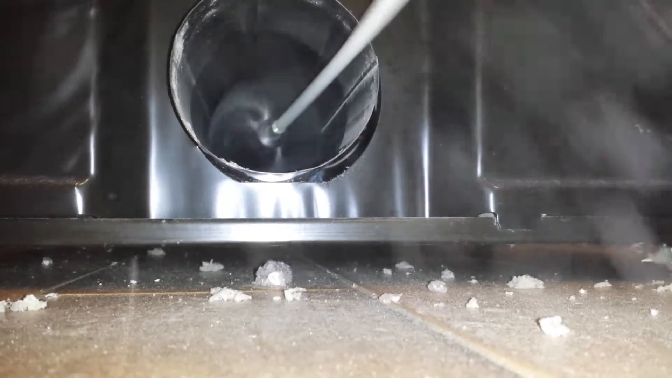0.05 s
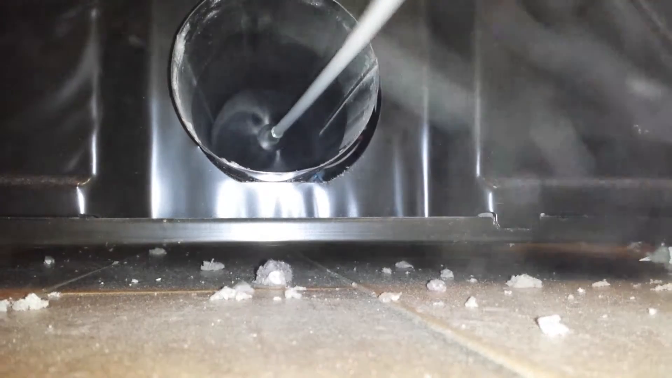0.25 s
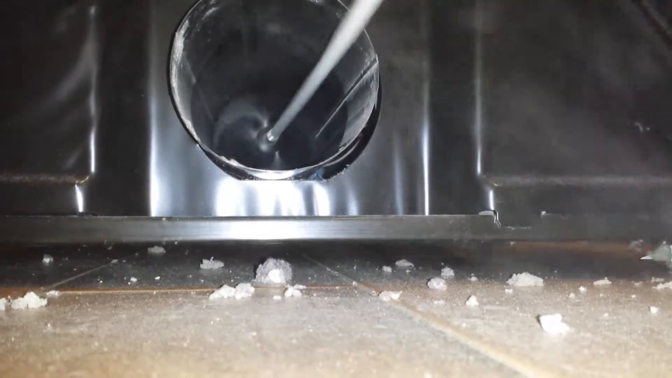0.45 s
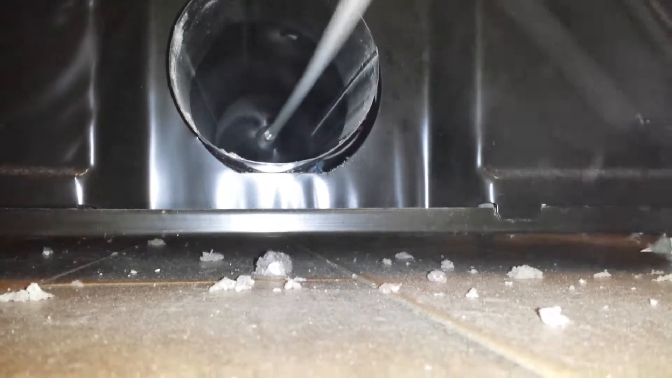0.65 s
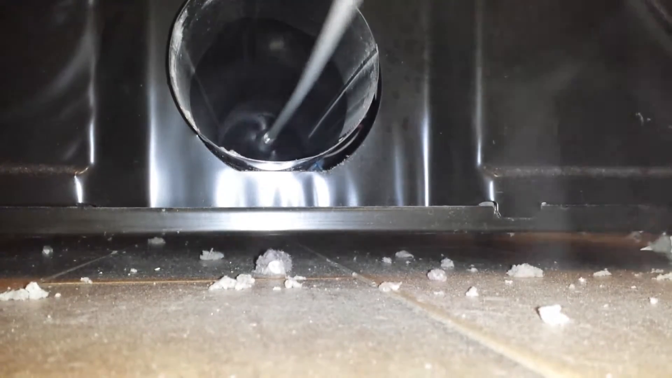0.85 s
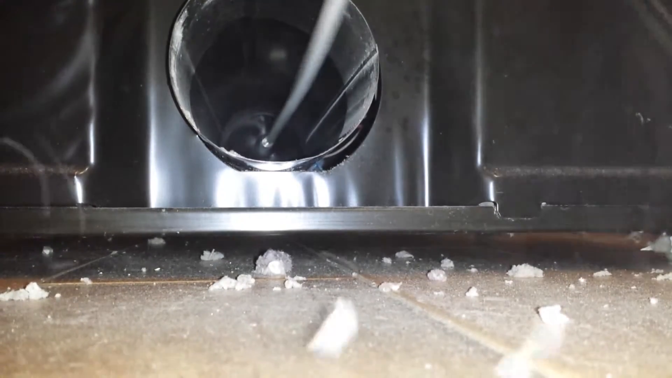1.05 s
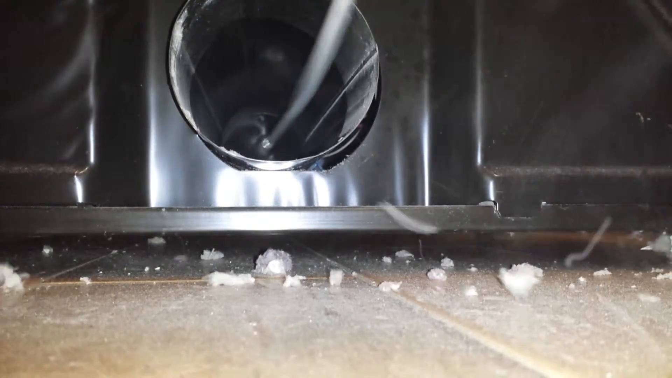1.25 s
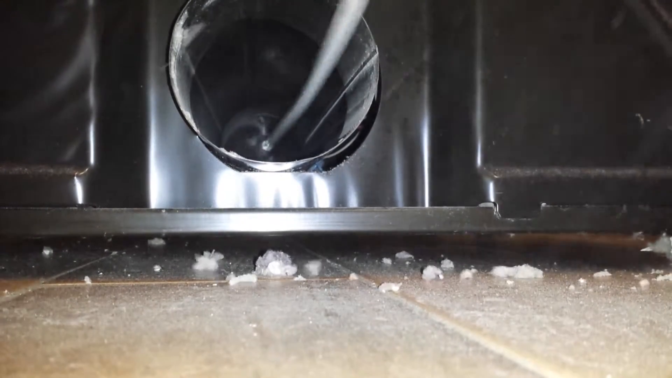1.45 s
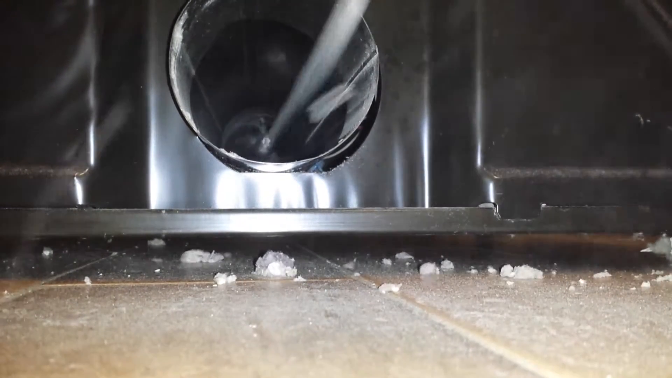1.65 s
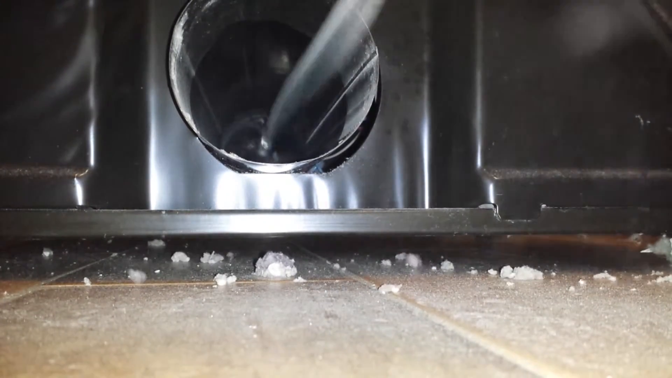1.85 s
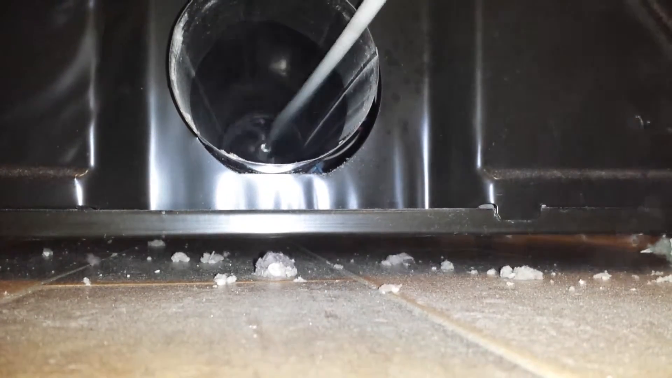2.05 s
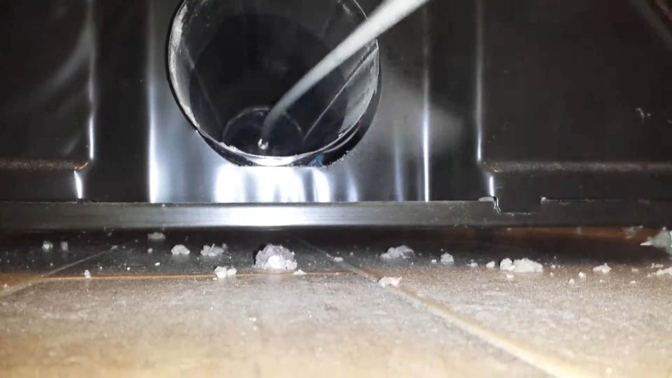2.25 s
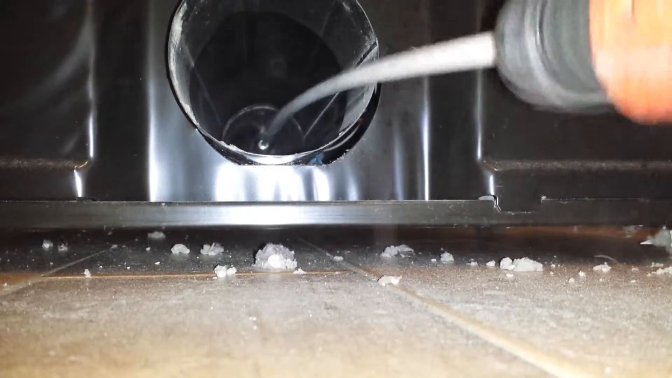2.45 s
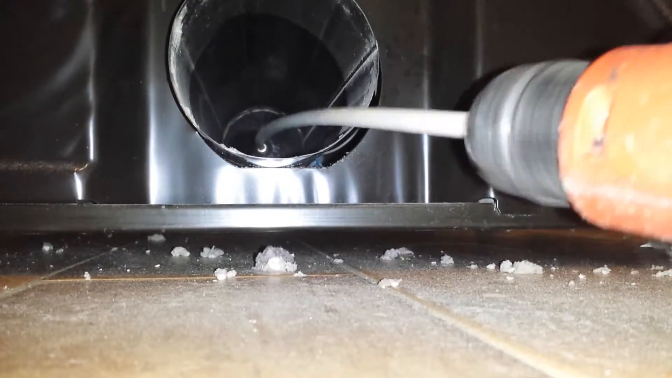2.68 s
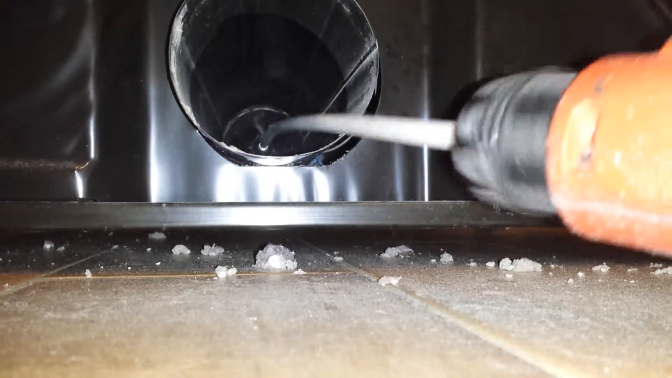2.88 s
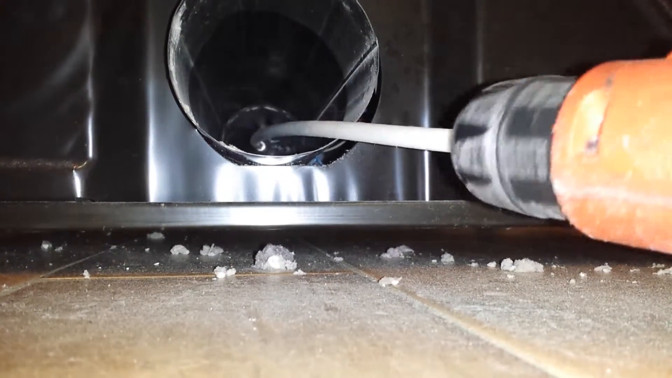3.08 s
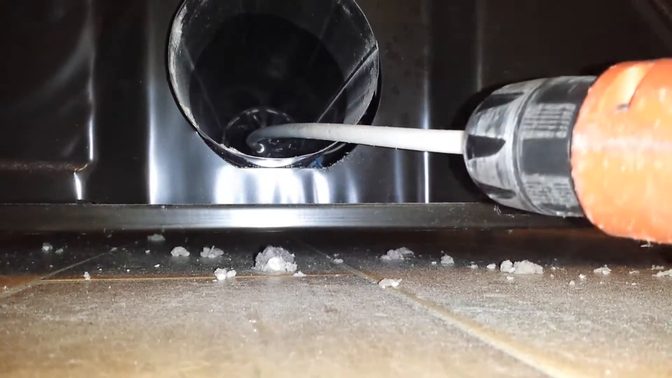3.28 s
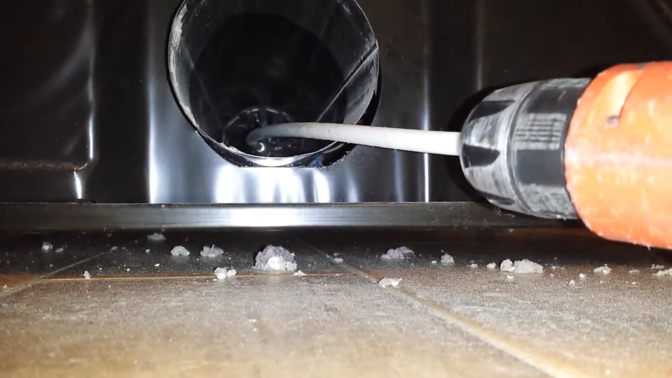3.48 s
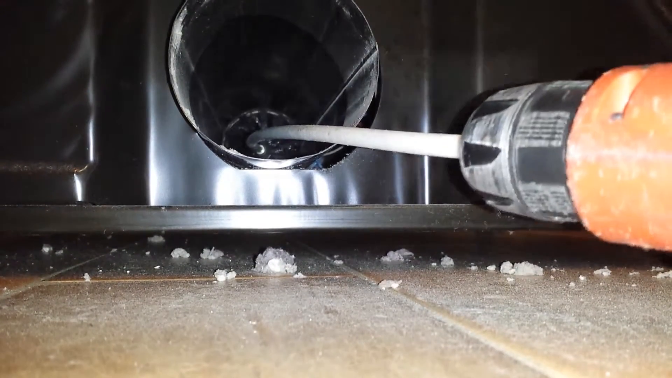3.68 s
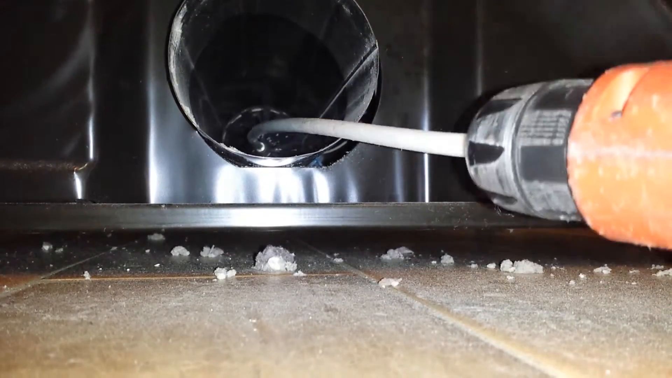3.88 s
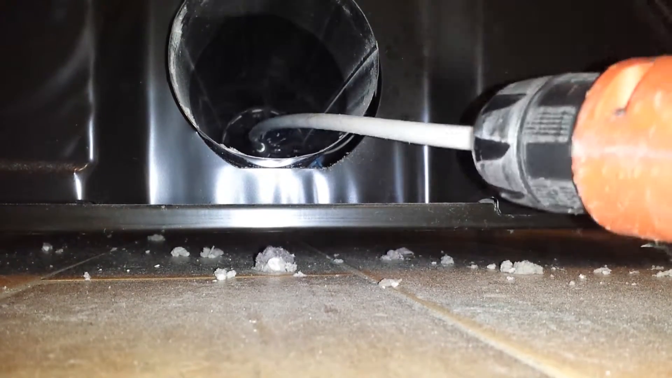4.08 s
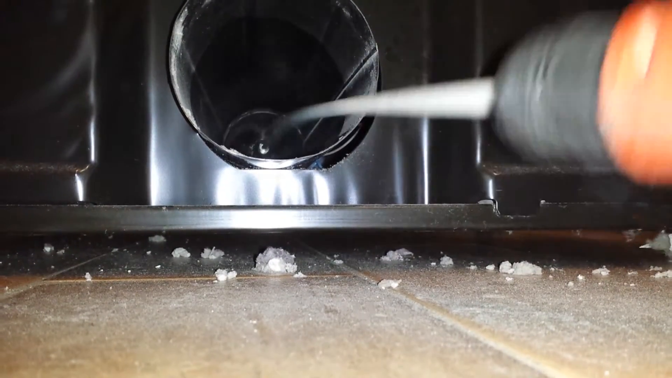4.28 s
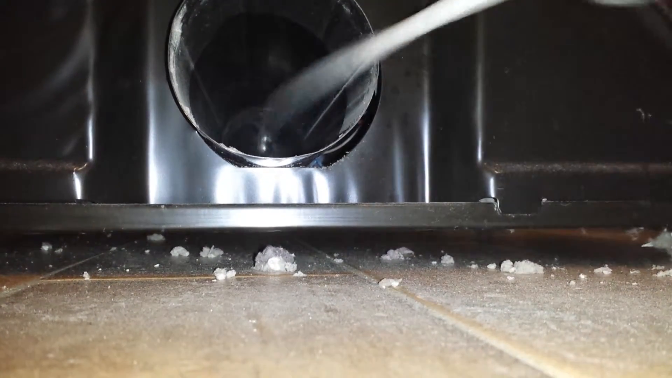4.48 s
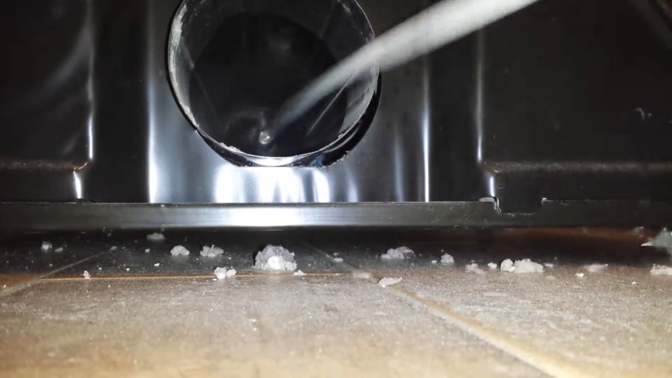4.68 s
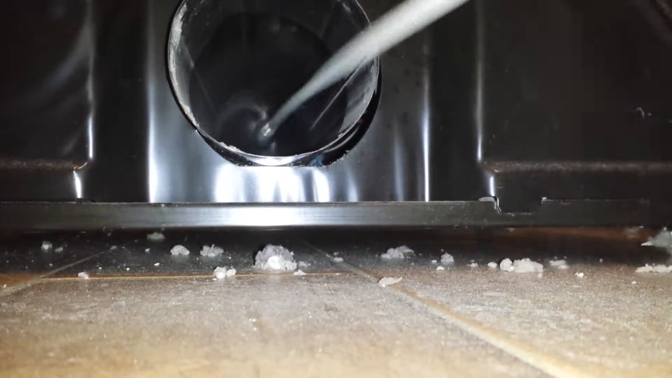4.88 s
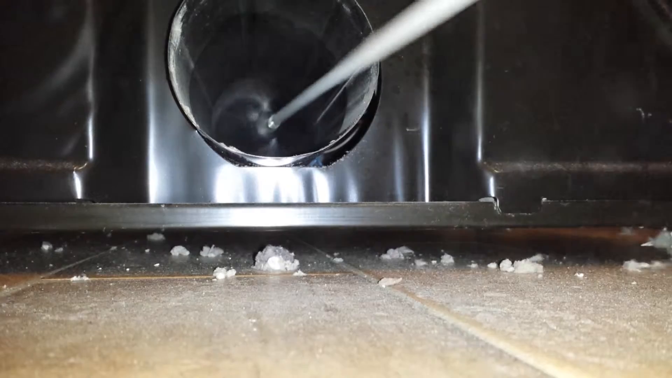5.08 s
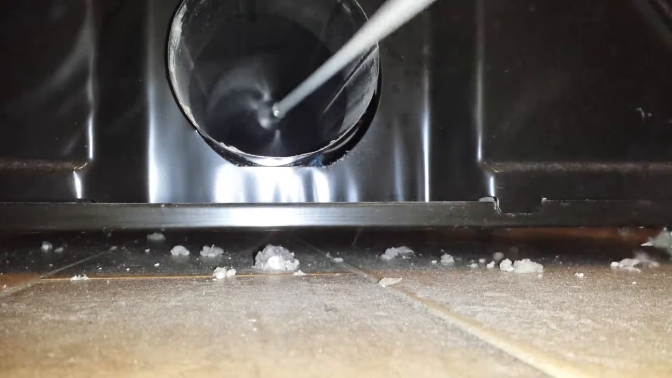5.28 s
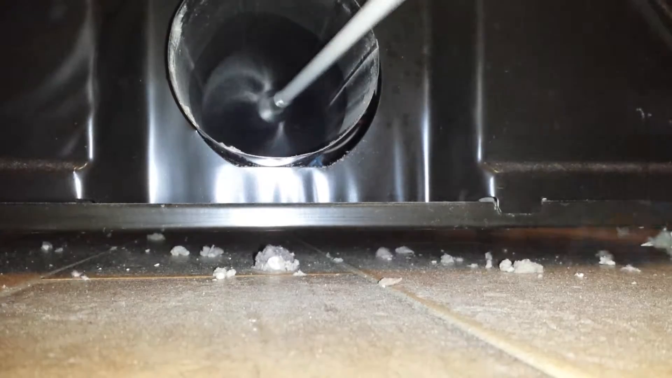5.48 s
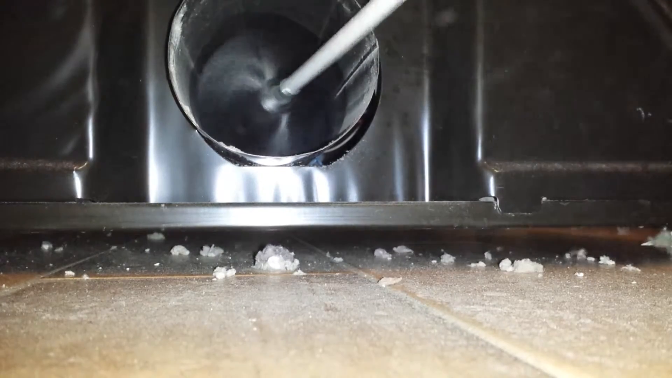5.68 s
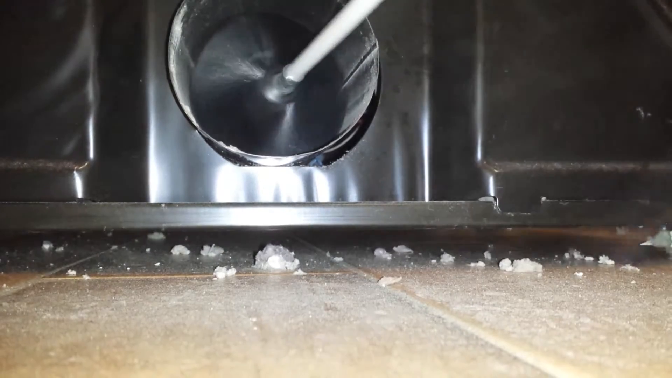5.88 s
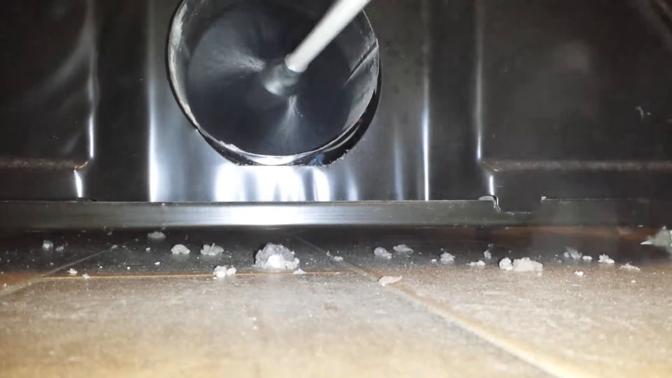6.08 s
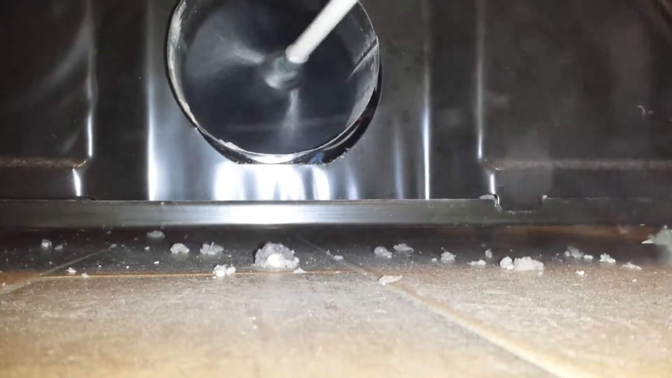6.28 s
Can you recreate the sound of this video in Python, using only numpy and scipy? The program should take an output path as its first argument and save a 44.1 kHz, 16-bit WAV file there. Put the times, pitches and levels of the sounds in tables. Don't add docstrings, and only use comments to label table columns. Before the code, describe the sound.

Indoors, close to a metal vent pipe, a hand drill runs at full speed from the start: a dense gritty hiss with high whine and a fuzzy low rod drone fading after about 0.6 s. Soft air buffeting swells around 0.75 to 1.8 s, strongest near 1.4 s, mostly on the left. At 1.2 s the trigger is released; the pitch glides down, whine breaking into a rattling whir, brighter and closer to the left. A hard rap lands at 2.73 s, then slowing clicks end at about 3.2 s. Faint mains hum remains, with a soft knock at 3.37 s, rubbing fingers and hollow bumps at 3.8 and 4.07 s. Gear teeth click from 4.14 s, loudest at 4.24 s, and the motor surges upward, with heavy air blasts around 4.7 to 4.9 s. A hard rap booms at 5.49 s, and the drone returns under steady high whirring until the end, at 6.3 s.

```python
import sys
import numpy as np
from scipy import signal
from scipy.fft import rfft, irfft, next_fast_len
from scipy.io import wavfile
from scipy.ndimage import uniform_filter1d, map_coordinates

SR = 44100
rng = np.random.default_rng(int(sys.argv[2]) if len(sys.argv) > 2 else 0)


def master_out(mix):
    frames = np.transpose(np.atleast_2d(mix))
    ceiling = np.clip(frames, -1, 1)
    pcm = np.round(ceiling * 32767).astype(np.int16)
    wavfile.write(sys.argv[1], SR, pcm)


def how_loud(loudness_db):
    steps = np.asarray(loudness_db, float) / 20
    return 10 ** steps


N = 279594
T = np.arange(N) / SR
TRIGGER_S = 4.245
FULL_HZ = 490
TEETH = 8

# (time [s], nearness [dB], nose towards the ports [0-1],
# left-right [dB], vents towards the ports [0-1])
HAND_HOLD = [(0, -16, .1, -1, 1), (.4, -15.5, .1, 0, .9), (.62, -14, 0.03, 1, 1), (.98, -12, 0, -0.5, .4),
             (1.2, -12, .05, -1.5, .7), (1.55, -14, 0.27, -3, .8), (2.25, -14.5, 0.72, -2.5, .9),
             (2.5, -14, .85, 3, .4), (2.85, -12, 0.93, 9.5, .2), (3.2, -12, 1, 8, .4),
             (4.25, -19, 0.9, 8.5, .1), (4.43, -21, .9, 3.5, .05), (4.56, -17, .6, 1, .45),
             (4.71, -12.5, 0.4, 5, .5), (4.95, -11.5, 0.3, 5.5, 0), (5.36, -16, .3, 0.5, .15),
             (5.8, -16, .3, 1, .3), (6.34, -17, .2, 0, .15)]
# (frequency [Hz], level [dB per Hz])
CASE_COLOUR = [(820, -29), (1400, -5), (1650, -1.5), (1900, -5), (2370, 1.5), (2600, 3.5), (2780, -0.5),
               (3240, 0), (3970, -10), (5200, -19.5), (6760, -31), (11400, -120)]


def unit(x):
    return x / np.sqrt(np.mean(x ** 2) + 1e-20)


def along(points, hz):
    f, v = np.transpose(points)
    return np.interp(np.log(hz + 1), np.log(f + 1), v, left=-120)


def curves(rows):
    s, *cols = np.transpose(rows)
    return [np.interp(T, s, c) for c in cols]


def wobble(rate):
    return map_coordinates(rng.standard_normal(int(N * rate / SR) + 4), [T * rate])


def held(rows, rise, fall_db):
    gain = 0
    for s, length, db in rows:
        falling_db = fall_db * np.maximum(T - s - length, 0)
        gain = gain + np.clip((T - s) / rise, 0, 1) * how_loud(db - falling_db)
    return gain


def coloured(x, spectrum, centre_hz=1, width=1e9):
    m = next_fast_len(N + 8192)
    hz = np.fft.rfftfreq(m, 1 / SR)
    hump = 1 + 1.29 * np.exp(-((hz - centre_hz) / width) ** 2)
    gain = how_loud(along(spectrum, hz)) * hump
    return irfft(rfft(x, m) * unit(gain), m)[..., :N]


def heard(x):
    nose = curves(HAND_HOLD)[1]
    new_grip = np.clip(2 * (T - TRIGGER_S), 0, 1)
    lag = (-16 * nose - 7 * new_grip) / 2
    return np.array([map_coordinates(x, [np.arange(N) - side * lag], mode="nearest") for side in (1, -1)])


def noise(alike, patchy_db):
    z = signal.stft(rng.standard_normal((3, N)), nperseg=256)[2]
    patches = uniform_filter1d(rng.standard_normal(z.shape[1:]), 5, 0)
    patches = unit(uniform_filter1d(patches, 16, 1))
    shared, *own = unit(signal.istft(z * how_loud(patchy_db * patches), nperseg=256)[1][:, :N])
    alike = np.clip(alike, 0, 1)
    return np.sqrt(alike) * heard(shared) + np.sqrt(1 - alike) * np.array(own)


def sides(pan_db):
    return how_loud(np.outer([.5, -.5], pan_db)) * np.sqrt(2 / (how_loud(pan_db) + how_loud(-pan_db)))


def decays(strikes, t60):
    return signal.lfilter([1], [1, -how_loud(-60 / (t60 * SR))], strikes)


def room_tone():
    # (frequency [Hz], level [dB rms])
    mains = [(118, -70), (58, -75)]
    # (frequency [Hz], level [dB per Hz])
    quiet = [(18, -51.5), (30, -19), (49, -18), (86, -24), (103, -12.5), (123, -0.5), (181, -24),
             (383, -17.5), (1310, -28.5), (13000, -35), (14000, -29.5)]
    hum = sum(np.sqrt(2) * how_loud(db + 1.5 * wobble(8)) * np.sin(2 * np.pi * hz * T) for hz, db in mains)
    return hum + how_loud(-67) * coloured(noise(.4, 2), quiet)


def motor():
    # (time [s], speed [turns/s])
    coasting = [
        (0, 490),
        (1.16, 488.8),
        (1.23, 481),
        (1.45, 400),
        (1.82, 286.2),
        (2.28, 177),
        (2.78, 80),
        (3.1, 20),
        (3.23, .1),
    ]
    # (time [s], speed [turns/s])
    pulling_up = [
        (4.255, 6),
        (4.35, 90),
        (4.5, 305),
        (4.55, 342),
        (4.7, 413),
        (4.86, 443.8),
        (5.16, 469.3),
        (5.55, 484.2),
        (6.34, 492.3),
    ]
    drag_hz, free_hz = 150, 494
    (s0, down), (s1, up) = np.transpose(coasting), np.transpose(pulling_up)
    coast = np.exp(np.interp(T, s0, np.log(down + drag_hz))) - drag_hz
    return np.where(T < TRIGGER_S, coast, free_hz - np.exp(np.interp(T, s1, np.log(free_hz - up))))


def tone(k, turns, turns_hz, db, fading_db):
    fading = how_loud(db + fading_db * np.array([wobble(6), wobble(5.6)]))
    audible = k * turns_hz < SR / 2.5
    return np.sqrt(2) * fading * np.sin(2 * np.pi * (k * turns + rng.random())) * audible


def tooth_gate(turns):
    blows = np.diff(np.floor(TEETH * turns), prepend=0) * how_loud(2.7 * rng.standard_normal(N))
    gate = decays(blows, t60=.018)
    return gate / np.sqrt(np.abs(uniform_filter1d(gate ** 2, 2600)) + 1e-3) + .22


def armature_whine(turns, turns_hz):
    # (multiple of motor speed, level in the hiss [dB], left-right [dB])
    orders = [(3, -25, -22), (4, -32.5, 2), (5, -26.5, -14.5), (6, -29.5, -6.5), (9, -28, 5),
              (10, -23.5, 11), (12, -20, 21.5), (13, -26, 21.5), (15, -24, -14.5), (16, -20, -28),
              (18, -38, -2.5)]
    tones = sum(sides(pan_db) * tone(k, turns, turns_hz, db, fading_db=5.5) for k, db, pan_db in orders)
    return (turns_hz / FULL_HZ) ** 7 * tones


def plastic_shell(drive, turns, turns_hz, run_db):
    # (frequency [Hz], level [dB per Hz])
    shell_colour = [(2350, -11), (4000, -5), (4220, -5.5), (4730, -3.5), (5120, -3), (5700, -3.5),
                    (7560, -3), (8860, -5), (11500, -18), (15000, -49.5), (22000, -120)]
    # (centre [Hz], width [Hz])
    humps = [
        (5900, 600),
        (6600, 970),
        (7300, 900),
    ]
    # (frequency [Hz], level [dB per Hz])
    fizz_colour = [(10500, -43.5), (11800, -1), (14400, -9.5)]
    # (start [s], length [s], level against the shell [dB])
    jaws = [
        (2.66, 0.34, -18),
    ]
    # (frequency [Hz], level [dB per Hz])
    jaw_colour = [(10300, -42), (10900, 0), (11900, -0.5), (12400, -37.5), (22000, -120)]
    near_db, nose, pan_db, vents = curves(HAND_HOLD)
    slow = np.log10(turns_hz / FULL_HZ)
    blades = 40
    whistling = np.clip(blades * turns_hz / 5000 - .9, 0, 2.5) * (turns_hz > 172)
    whistle = whistling * tone(blades, turns, turns_hz, -15 + 3 * wobble(30), fading_db=2)
    shaken = drive(0.26, whistle)

    turned = 2 * np.clip(vents, 0, 1)
    shell = 0
    for k, hump in enumerate(humps):
        share = np.clip(1 - np.abs(turned - k), 0, 1)
        shell = shell + share * coloured(shaken, shell_colour, *hump)
    shell = coloured(shell, [(20, -1), (11300, -1.5), (12300, -33.5)]) / 1.516
    fizz_db = -22 + 5.5 * nose + 15 * slow - .6 * (near_db + 16) + 1.4 * wobble(7)
    shell = shell + how_loud(fizz_db) * coloured(shaken, fizz_colour)
    shoulder = signal.sosfiltfilt(signal.butter(4, 4970, fs=SR, output="sos"), shell)
    shell = shell + (how_loud(-0.87 * (near_db + 14.5)) - 1) * shoulder
    shell = shell + held(jaws, .05, 200) * coloured(shaken, jaw_colour)
    return sides(pan_db - 1.0) * how_loud(run_db + 1.0) * shell


def grip_and_case(drive, turns, turns_hz, run_db):
    # (frequency [Hz], level [dB per Hz])
    grip_colour = [(150, -52.5), (250, -15), (412, -14), (481, -6), (547, -7.5), (801, -8.5), (979, -4.5),
                   (2200, -7.5), (2860, -45), (4840, -120)]
    # (multiple of motor speed, level [dB])
    overtones = [(16, -24), (20, -23), (24, -16.5), (26, -24), (28, -21), (32, -17.5), (36, -19), (40, -18),
                 (44, -19), (48, -19), (56, -20), (64, -20), (80, -22)]
    nose_db = 18.5 * curves(HAND_HOLD)[1]
    ringing = 0
    for k, db in overtones:
        near_resonance = np.exp(-((k * turns_hz - 2600) / 750) ** 2)
        ringing = ringing + near_resonance * tone(k, turns, turns_hz, db + 4 * wobble(30), fading_db=-1)
    grip = how_loud(run_db - 16 + 0.27 * nose_db) * coloured(drive(0.6, 0), grip_colour)
    return grip + how_loud(run_db - 19 + nose_db) * coloured(drive(0.52, ringing), CASE_COLOUR)


def clean_tones(turns, turns_hz):
    # (multiple of motor speed, level at the mean distance [dB],
    # growth with nearness [dB per dB], loss at a tenth of the speed [dB])
    pure_tones = [(1, -31.5, 1.7, 61.5), (2, -37.5, .2, 40.5), (8, -5, 0.68, -5)]
    # (frequency [Hz], level [dB])
    tooth_curve = [(1000, -44.5), (1500, -31), (2050, -34), (2450, -25.5), (2950, -31.5), (3200, -26),
                   (3600, -26.5), (3900, -34)]
    # (time [s], half length [s], level [dB])
    floats = [
        (1.32, .11, -15),
        (4.32, .095, -15),
        (4.7, .09, -11),
    ]
    near_db, pulling = curves(HAND_HOLD)[0], T > TRIGGER_S
    slow = np.log10(turns_hz / FULL_HZ)
    load_db = pulling * (5 + 5 * np.clip(-12 * slow, 0, 1))
    load_db = load_db + sum(db * np.exp(-((T - s) / half) ** 4) for s, half, db in floats)
    tooth_db = along(tooth_curve, TEETH * turns_hz) + load_db + 2.2 * wobble(22)
    slowing = slow * np.where(pulling, -1.3 * slow, 1)
    lines = 0
    for k, db, grows, loss_db in pure_tones:
        level_db = db + grows * (near_db + 15.5) + loss_db * slowing + (round(k) == TEETH) * tooth_db
        lines = lines + tone(round(k), turns, turns_hz, level_db, fading_db=1.5)
    return lines


def drill():
    turns_hz = motor()
    turns = np.cumsum(turns_hz * (1 + .001 * wobble(25))) / SR
    near_db, _, pan_db, _ = curves(HAND_HOLD)
    gate = tooth_gate(turns)
    chuck_turns = 2 * np.pi * turns / 16.6
    chuck = how_loud(0.38 * np.sin(chuck_turns) + .5 * np.sin(2 * chuck_turns) + 0.26 * wobble(9))
    whine = armature_whine(turns, turns_hz)

    def drive(alike, extra):
        return chuck * (gate * noise(alike, patchy_db=1.02) + whine + extra)

    coasting_db = 14.5 * np.log10(turns_hz / FULL_HZ) - 16 * np.clip(1 - turns_hz / 24, 0, 1) ** 2
    starting_db = np.minimum(300 * (T - TRIGGER_S) - 12, 0)
    run_db = near_db + np.where(T > TRIGGER_S, starting_db, coasting_db)
    body = grip_and_case(drive, turns, turns_hz, run_db) + clean_tones(turns, turns_hz)
    return sides(pan_db + 1.5) * body + plastic_shell(drive, turns, turns_hz, run_db)


def rod_drone():
    # (start [s], length [s], level [dB])
    drones = [
        (-.2, .75, -44.5),
        (5.52, .95, -41.5),
    ]
    colour = [(255, -54.0), (285, 18.5), (298, 0.0), (330, -75.5)]  # (Hz, dB per Hz)
    return held(drones, .073, 60.5) * coloured(noise(0.69, 0), colour)


def cooling_air():
    # (time [s], half length [s], level [dB], left-right [dB], upper part [dB])
    gusts = [(.01, 0.024, -53.5, 6.5, 9), (0.31, 0.47, -49, 8, -1.5), (0.755, 0.087, -32, 8, -1.5),
             (1.09, 0.066, -28, -14, -2), (1.286, 0.082, -24, -29, 8.5), (1.354, 0.061, -26, -25, 9.5),
             (1.422, 0.15, -22, -25, -0.5), (1.75, 0.38, -32.5, -15, -0.5), (2.285, 0.067, -34.5, 12, -8),
             (2.433, 0.13, -41.5, 1.5, -8), (2.73, 0.095, -43, 1, -2.5), (3.085, .2, -59, -0.5, 2),
             (3.865, 0.089, -56, 0.5, -6), (4.201, 0.1, -48.5, 3, 0.5), (4.547, 0.082, -31, -0.5, 1),
             (4.688, 0.079, -19.5, -17.5, 3), (4.886, .05, -25.5, 27, -7.5), (5.071, 0.26, -32, 10, -5),
             (5.342, 0.027, -30.5, 9, 2.5), (5.481, .04, -29.5, 35, 2.5), (5.786, 0.54, -43.5, 19, -13),
             (6.202, .15, -62, 9, 4.5)]
    # (frequency [Hz], level [dB per Hz])
    puff = [(15, -69.5), (25, -17.5), (87, 5.5), (177, 6.5), (204, 4), (260, -0.5), (340, -24.5),
            (570, -120)]
    # (frequency [Hz], level [dB per Hz])
    blast = [(180, -21), (240, -8.5), (400, -11.5), (600, -17), (1200, -26.5), (1800, -51.5)]
    low_power, upper_power = 0, 0
    for s, half, db, pan_db, upper_db in gusts:
        swell = sides(pan_db) * how_loud(db + 2.0 - 7.1 * ((T - s) / half) ** 2)
        low_power = low_power + swell ** 2
        upper_power = upper_power + (swell * how_loud(upper_db)) ** 2

    def lumps():
        return unit(how_loud(1.4 * np.array([wobble(18), wobble(18)]))) * noise(0.025, 0.68)

    return np.sqrt(low_power) * coloured(lumps(), puff) + np.sqrt(upper_power) * coloured(lumps(), blast)


def knocks():
    # (time [s], crack peak [dB], boom [dB])
    hits = [
        (2.7311, -8, -30.5),
        (3.3708, -34, -40.5),
        (3.7794, -48, -65),
        (3.7996, -30.5, -61),
        (3.835, -26.5, -33),
        (4.067, -23, -33),
        (5.4876, -9.5, -29.5),
    ]
    pipe_hz, delay_s, burst_s = 342.7, 0.0099, 0.01
    out = np.zeros((2, N))
    t = T[:SR // 5]
    late = t - delay_s
    for s, crack_db, boom_db in hits:
        cycles = pipe_hz * late * (1 + 4.0 * np.minimum(late, .03))
        fall = np.where(late < burst_s, 1, how_loud(-4.5 - 60 * (late - burst_s) / 0.13))
        burst = np.clip(late / .002, 0, 1) * fall
        smear = signal.lfilter([.1], [1, -.9], rng.standard_normal(len(t))) * how_loud(-60 * t / 0.18)
        boom = how_loud(boom_db - 2.5) * (burst * np.sin(2 * np.pi * cycles) + 0.5 * smear)
        crack = how_loud(crack_db - 3 - 60 * t / 0.011) * rng.standard_normal((2, len(t)))
        out[:, round(s * SR):][:, :len(t)] += boom + signal.lfilter([.4], [1, -.9, .45], crack)
    return sides(4) * out


def first_teeth():
    # (time [s], peak [dB], share in the shell [dB])
    clicks = [
        (2.7322, -17, 7),
        (4.141, -37, 2),
        (4.1607, -20.5, 0),
        (4.194, -24, -3),
        (4.21, -16, -2.5),
        (4.228, -17, -6.5),
        (4.2429, -3.5, -13.5),
        (4.2646, -11, -9),
    ]
    case, shell = np.zeros((2, N))
    for s, db, shell_db in clicks:
        case[round(s * SR)] = how_loud(db - 9)
        shell[round(s * SR)] = how_loud(db + shell_db - 0.5)

    def struck(blows, t60):
        return decays(blows, t60) * noise(.4, 0) + 1.5 * blows

    shell_colour = [(2350, -11), (4000, -5), (4220, -5.5), (4730, -3.5), (5120, -3), (5700, -3.5),
                    (7560, -3), (8860, -5), (11500, -18), (15000, -49.5), (22000, -120)]
    return sides(6) * (coloured(struck(case, 0.053), CASE_COLOUR) + coloured(struck(shell, 0.016), shell_colour))


def finger_rubs():
    # (start [s], length [s], level [dB])
    rubs = [
        (3.19, 0.03, -54.5),
        (3.25, .14, -61.5),
        (3.79, 0.095, -49.5),
        (3.91, 0.1, -60),
        (4.005, .02, -52.5),
        (4.062, .02, -53),
        (4.09, .05, -64.5),
        (4.135, 0.065, -40.5),
        (4.2, .09, -40),
    ]
    # (frequency [Hz], level [dB per Hz])
    skin = [(240, -27.5), (400, 4.5), (694, 5), (1180, 0), (2350, -3.5), (2890, -5), (4940, -2), (5480, 4),
            (6860, 2), (7840, 0), (14000, -19)]
    grains = decays((rng.random(N) < .012) * how_loud(3 * rng.standard_normal(N)), t60=0.018)
    rubbing = coloured(unit(1.8 + grains) * noise(0.39, 1.2), skin)
    return sides(4) * how_loud(3.0) * held(rubs, .012, 171) * rubbing


def scene():
    return room_tone() + drill() + rod_drone() + cooling_air() + knocks() + first_teeth() + finger_rubs()


def roll_off(x):
    return signal.sosfilt(signal.butter(12, 14460, fs=SR, output="sos"), x)


def record(dry):
    # (frequency [Hz], left-right [dB])
    port_lean = [(0, 5.5), (2200, -1.5), (4100, 4), (7500, -1), (14000, -12.5), (22050, -8.5)]
    lean_db = along(port_lean, np.fft.rfftfreq(N, 1 / SR))
    ports = irfft(rfft(dry) * how_loud(np.outer([.5, -.5], lean_db)), N)
    flat = ports / (1 + np.abs(ports) ** 6) ** (1 / 6)
    return roll_off(flat)


dry = scene()
out = record(dry)
master_out(out)
```